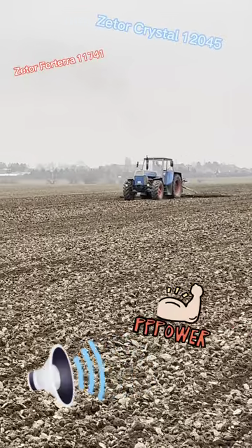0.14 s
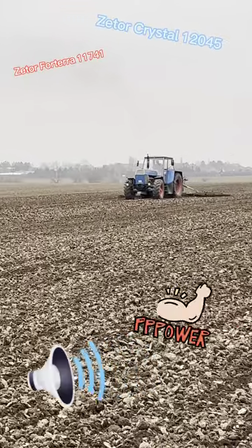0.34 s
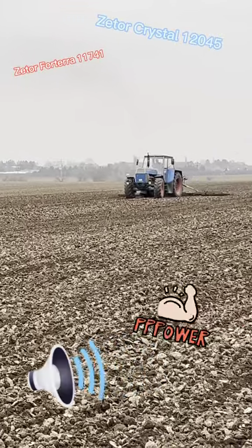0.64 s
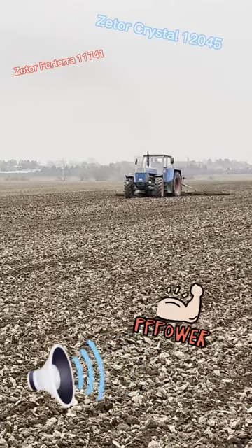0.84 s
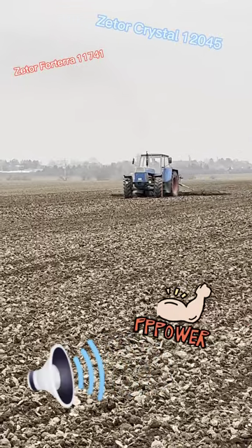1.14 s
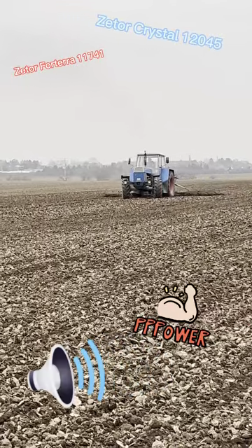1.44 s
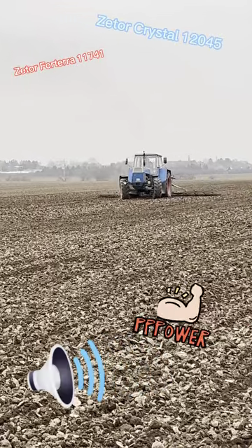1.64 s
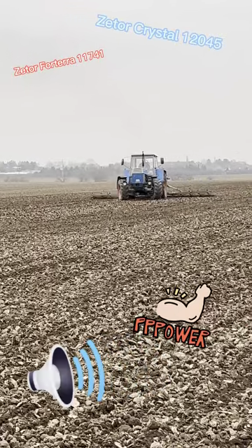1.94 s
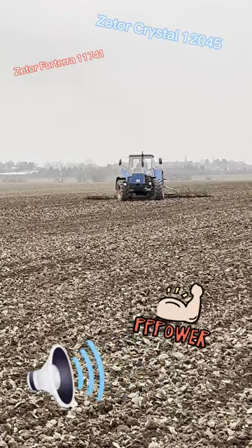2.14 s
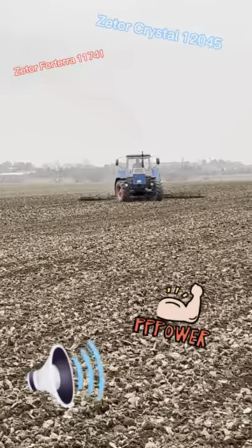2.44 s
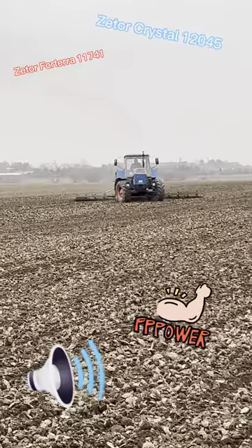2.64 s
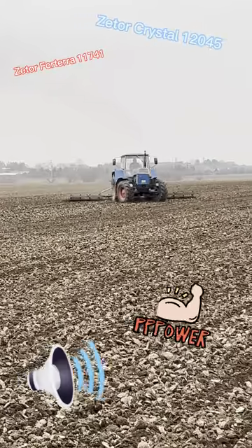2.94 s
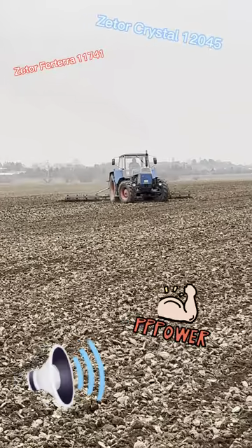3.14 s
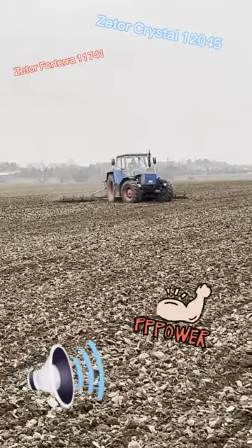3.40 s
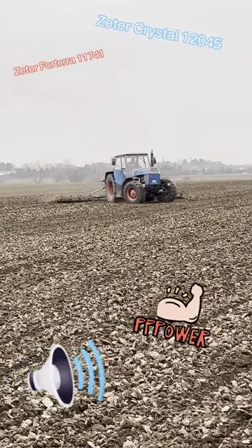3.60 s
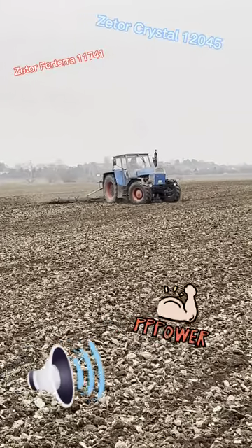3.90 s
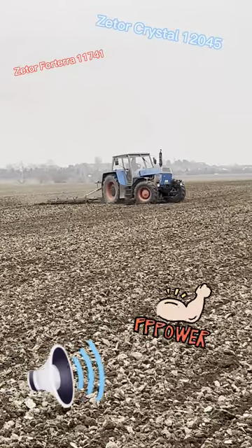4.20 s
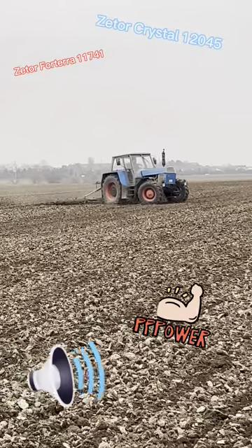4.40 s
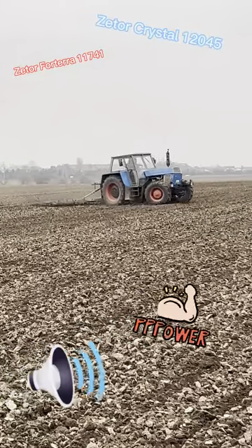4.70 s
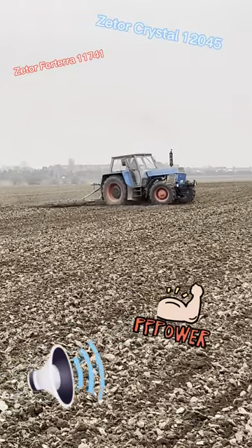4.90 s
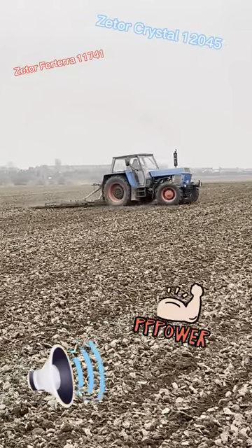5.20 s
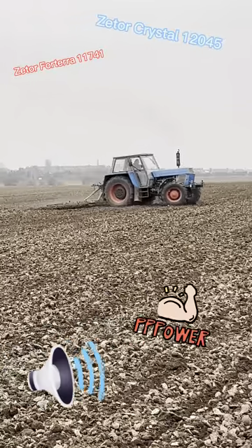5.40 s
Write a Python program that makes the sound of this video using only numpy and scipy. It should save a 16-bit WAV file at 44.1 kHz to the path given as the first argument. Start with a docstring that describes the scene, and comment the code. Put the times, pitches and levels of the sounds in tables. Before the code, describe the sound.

Continuous heavy tractor engine working hard outdoors, already running at the start and still running at the end. The firing pulses merge into a deep buzzing hum with slight speed wavering, overlaid by dense knocking, occasional harder metallic knocks and uneven hiss from fan and harrow. The level rises gently as the machine approaches and shows its side. Low wind lumps brush the handheld stereo microphone in a dry open field.

```python
"""A six-cylinder diesel tractor turns at the end of a bare field and comes nearer, its governor hunting under load.
Exhaust: sines at orders of the engine cycle. Block knock, valve clatter: coloured noise that swells once a firing;
the knock partly repeats each cycle, with gear tones and a few hard rings on it. Fan and harrow: patchy hiss.
Wind: lumpy low noise in a breeze and gusts, plus a part of opposite sign at the two ports of a handheld recorder."""
import sys
import numpy as np
from scipy import signal
from scipy.fft import rfft, irfft, next_fast_len
from scipy.io import wavfile
from scipy.ndimage import uniform_filter1d, map_coordinates

SR = 44100
rng = np.random.default_rng(int(sys.argv[2]) if len(sys.argv) > 2 else 0)


def generate_wav(signal):
    """Clip the signal to [-1, 1] and save it as 16-bit WAV at the path in sys.argv[1]."""
    frames = np.transpose(np.atleast_2d(signal))
    scaled = np.clip(frames, -1, 1) * 32767
    pcm = np.round(scaled).astype(np.int16)
    wavfile.write(sys.argv[1], SR, pcm)


N = 244755
T_S = np.arange(N) / SR

# knock strength of each cylinder, in firing order [level/dB]
CYLINDERS_DB = [-1.2, -1.3, -0.59, -1, -1, 0.31]
FIRING_SCATTER_DB = 0.93  # no two firings knock alike
HISS_PHASE_FIRINGS = .09  # where hiss and flank swell, as a share of a firing; the exhaust's crest is at .25


def amp(db):
    """Gain of a level in dB."""
    return 10 ** (np.asarray(db) / 20)


def unit(x):
    """x at rms 1."""
    return x / np.sqrt(np.mean(x ** 2) + 1e-20)


def along(points, hz):
    """(f/Hz, value) points interpolated on a log axis."""
    f, v = np.transpose(points)
    return np.interp(np.log(hz + 1), np.log(f + 1), v)


def curves(rows):
    """One value per sample for each column after the time."""
    s, *cols = np.transpose(rows)
    return [np.interp(T_S, s, c) for c in cols]


def wobble(rate_hz):
    """Smooth random curve, rate_hz knots a second (at most 40)."""
    knots = rng.standard_normal(int(N * 40 / SR) + 4)
    return map_coordinates(knots, [np.arange(N) * min(rate_hz, 40) / SR])


def bumps(times_s, width_s):
    """One Gaussian bell of height 1 and half width width_s for each time, as rows."""
    return np.exp(-.5 * ((T_S - np.array(times_s)[:, None]) / width_s) ** 2)


def filtered(x, response):
    """x times a complex response of frequency."""
    m = next_fast_len(N + SR // 2)
    return irfft(rfft(x, m) * response(np.fft.rfftfreq(m, 1 / SR)), m)[..., :N]


def coloured(x, spectrum):
    """x through a spectrum, at rms 1."""
    return unit(filtered(x, lambda hz: amp(along(spectrum, hz))))


def band(x, hz, width_hz):
    """The part of x under a Gaussian band; width_hz spans one sigma either side."""
    return filtered(x, lambda f: np.exp(-.5 * ((f - hz) / width_hz * 2) ** 2))


def edge(x, hz, above, db):
    """x with the part above or below hz changed by a gain in dB over time."""
    slope = -6 if above else 6
    part = filtered(x, lambda f: 1 / (1 + (np.maximum(f, 1) / hz) ** slope))
    return x + (amp(db) - 1) * part


def patchy(patchy_db):
    """Two noises sharing patches of random gain, as from air turbulence along the path."""
    z = signal.stft(rng.standard_normal((2, N)), nperseg=512)[2]
    field = rng.standard_normal(z.shape[1:])
    field = uniform_filter1d(field, size=7, axis=0)  # over frequency
    field = uniform_filter1d(field, size=24, axis=1)  # over time
    return signal.istft(z * amp(patchy_db * unit(field)), nperseg=512)[1][:, :N]


def repeating(phase, size, count):
    """Noise that comes back at every turn of phase and slowly changes into new patterns."""
    patterns = rng.standard_normal((count, size))
    drift = np.arange(N) * (count - 1) / N
    old = drift.astype(int)
    share = drift % 1 * np.pi / 2
    at = (phase % 1 * size).astype(int)
    return np.cos(share) * patterns[old, at] + np.sin(share) * patterns[old + 1, at]


def beat(cycle, depth_db, late):
    """Gain that swells once a firing, each cylinder at its own strength and each firing a little different."""
    firing = 6 * cycle - late
    number = np.floor(firing + .5).astype(int)
    cylinder_db = np.take(CYLINDERS_DB, number % len(CYLINDERS_DB))
    strength_db = cylinder_db + FIRING_SCATTER_DB * rng.standard_normal(1000)[number]
    swell = np.cos(2 * np.pi * firing)
    return amp(depth_db * swell + strength_db * (1 + swell) / 2)


def tone(cycle, order, db, waver_db, blur_rad=0., start=None):
    """One order of the engine cycle, its strength wavering and its phase wandering."""
    start = rng.random() if start is None else start
    gain = np.sqrt(2) * amp(db + waver_db * wobble(4.99))  # db is an rms level
    return gain * np.sin(2 * np.pi * (order * cycle + start) + blur_rad * wobble(20))


def side_on():
    """Near 0 while the tractor faces the listener, rising towards 1 as it shows its flank."""
    side_on_s, rise_s = 5.16, 0.19
    return 1 / (1 + np.exp((side_on_s - T_S) / rise_s))


def exhaust(cycle, firing_db):
    """The pipe sounds the firing rate (order 6); uneven cylinders add the orders between."""
    # weaker orders [multiple of the two-turn cycle, level re firing tone/dB, waver/dB]
    weak_orders = [(2, -36, 0), (4, -23, 0), (5, -27, 6), (7, -18, 2), (8, -31.5, -8), (10, -31, 1.5),
                   (11, -32, 2.5), (12, -30.5, 3), (15, -23, 1.7), (16, -33, 3), (18, -33.5, 5.5),
                   (20, -35.5, 4.5), (21, -30.5, 3.5), (24, -36.5, 2.5), (27, -31.5, 3.5), (31, -32.5, 3.5),
                   (33, -25, 0.5), (36, -26, 1)]
    # throb at half the firing rate [t/s, level/dB]
    half_rate = [(0.0, -43), (1.22, -38.5), (1.39, -48), (1.61, -38), (1.88, -47), (1.99, -39.5),
                 (3.62, -43), (5.24, -35), (5.55, -38)]
    # brief dips of drone and throb [t/s, gain/dB]
    dips = [(0.185, -20), (0.24, -6), (0.842, -8), (1.741, -8), (3.153, -16), (3.376, -24), (4.002, -5)]
    dip_half_width_s = .006
    uneven_turns = .25  # phase of both throbs: every other firing comes early rather than louder
    third_db, second_db = -13, -46  # order 9 re firing tone; order 12 when side-on
    weak_follow = 0.78  # share of the firing tone's swell that the weak orders follow
    blur_rad_per_order = .014

    drone = tone(cycle, 6, firing_db, waver_db=.5, start=0)
    throb = tone(cycle, 3, curves(half_rate)[0], waver_db=1.5, start=uneven_turns)
    throb = throb + tone(cycle, 9, firing_db + third_db, waver_db=0.0, start=uneven_turns)
    second = side_on() * tone(cycle, 12, second_db, waver_db=1)

    mean_db = firing_db.mean()
    weak_db = mean_db + weak_follow * (firing_db - mean_db)
    weak = sum(tone(cycle, round(k), weak_db + db, waver_db, blur_rad=blur_rad_per_order * k)
               for k, db, waver_db in weak_orders)
    dip_s, dip_db = np.transpose(dips)
    return amp(dip_db @ bumps(dip_s, dip_half_width_s)) * (drone + throb) + second + weak


def gear_tones(cycle):
    """Timing gear: sines at high orders, sinking into the knock as the tractor turns."""
    # [multiple of the cycle, level at t=0 re knock/dB]
    gear = [(48, -15.5), (60, -13.5), (66, -18), (72, -16.5), (84, -20.5), (96, -19)]
    fade_db_per_s, blur_rad_per_order = -0.48, .013
    return sum(tone(cycle, round(k), db + fade_db_per_s * T_S, waver_db=2.5, blur_rad=blur_rad_per_order * k)
               for k, db in gear)


def block_knock(cycle, alike):
    """Combustion knock through the block's resonances, partly alike each cycle, with the gear on it."""
    # block spectrum [f/Hz, relative density/dB]
    block = [(200, -29), (300, -16.5), (450, -12), (600, -8), (800, -2), (1050, 0.2), (1250, -3),
             (1550, -8), (1750, -9.5), (2000, -10), (2400, -20), (3000, -68)]
    # knock level [t/s, level/dB]
    knocking = [(0.0, -32), (.6, -33), (1.2, -32.5), (1.8, -33), (2.1, -32.5), (2.35, -32.5), (2.6, -31),
                (2.95, -31.5), (3.2, -32.5), (3.6, -32), (3.85, -30), (4.1, -30.5), (4.4, -29.5),
                (4.7, -30), (5.1, -30.5), (5.55, -30)]
    body_hz, hollow_db, fill_s = 626, -8, 0.71  # low body starts thin and fills in
    # a higher block resonance, heard at first and fading as the tractor turns
    nose_hz, nose_width_hz, nose_fade_s = 1320, 190, 2.07
    nose_drop_db, nose_final_db = 3.0, -0.75

    noise = 0.61 * alike + patchy(patchy_db=0.2)
    noise = noise * beat(cycle, depth_db=1.6, late=.31)
    knock = edge(coloured(noise, block), body_hz, False, hollow_db * np.exp(-T_S / fill_s))
    knock[0] += gear_tones(cycle)
    nose_db = nose_drop_db * np.exp(-T_S / nose_fade_s) + nose_final_db
    knock = knock + (amp(nose_db) - 1) * band(knock, nose_hz, nose_width_hz)
    return amp(curves(knocking)[0]) * knock


def hard_firings():
    """A few firings ring the block harder than the rest: decaying sines with a soft onset."""
    # [t/s, level before onset and decay/dB, ring f/Hz]
    hard = [(0.156, -22, 1210), (0.237, -22, 1260), (1.584, -16, 1080), (2.097, -17, 829),
            (2.389, -23, 1180), (2.559, -17, 1140), (2.634, -15, 1070), (2.673, -14.5, 1030),
            (3.181, -20.5, 939), (3.491, -16, 990), (3.615, -20, 1090), (3.66, -16, 1130),
            (3.718, -21, 1080), (4.057, -24, 1020), (4.361, -23.5, 1290), (4.415, -26, 1188),
            (4.888, -16, 1080), (5.053, -22, 1060), (5.22, -18, 1050), (5.503, -14, 1090)]
    t60_s, rise_s = 0.021, 0.001
    out = np.zeros(N + SR)
    t = np.arange(SR // 20) / SR
    for s, db, hz in hard:
        envelope = amp(db - 60 * t / t60_s) * (1 - np.exp(-t / rise_s))
        out[round(s * SR):][:len(t)] += envelope * np.sin(2 * np.pi * hz * t)
    return out[:N]


def valve_clatter(cycle, alike):
    """Valve gear: brighter noise, less alike from cycle to cycle, swelling once a firing."""
    # spectrum [f/Hz, relative density/dB]
    valves = [(1600, -20), (2400, -3), (2850, 1), (3300, -4.5), (3800, -9), (4300, -11), (5100, -7),
              (5600, -11), (6500, -78)]
    # [t/s, level/dB]
    clatter = [(0.0, -45.5), (0.8, -44), (1.8, -43.5), (2.4, -41), (3.2, -42.5), (3.9, -40), (5.55, -40.5)]
    noise = (0.33 * alike + patchy(patchy_db=1.5)) * amp(0.33 * wobble(12))
    noise = noise * beat(cycle, depth_db=1.7, late=.21)
    return amp(curves(clatter)[0]) * coloured(noise, valves)


def fan_and_harrow_hiss(cycle):
    """Patchy noise swelling once a firing; its top grows on approach and both its ends swing less."""
    # spectrum [f/Hz, relative density/dB]
    hiss_spectrum = [(4500, -9.5), (5600, -3), (6200, 5), (6800, 1.5), (7500, -0.5), (8300, -4.5),
                     (9000, -7.5), (10200, -17), (11600, -15.5), (13000, -19), (15000, -24)]
    # [t/s, level/dB]
    hissing = [(0.0, -56.5), (0.5, -51.5), (0.9, -54.5), (1.09, -46.5), (1.3, -50), (1.66, -54), (2.2, -47),
               (2.5, -50.5), (2.78, -49), (2.98, -53.5), (3.33, -51), (3.55, -52), (3.8, -47.5),
               (4.35, -49.5), (5.1, -46), (5.55, -49.5)]
    start_m, speed_m_per_s = 61, 6.9  # distance at the start, closing speed
    treble_hz, treble_swings = 8600, -0.42  # extra dB above the edge per dB of hiss swing
    treble_grows = 0.88  # extra dB above the edge per dB of approach
    low_hz, low_swings = 6800, -0.5  # extra dB below the edge per dB of hiss swing

    near_db = 20 * np.log10(start_m / (start_m - speed_m_per_s * T_S))
    hiss_db, = curves(hissing)
    swing_db = hiss_db - hiss_db.mean()
    treble_db = treble_swings * swing_db + treble_grows * (near_db - near_db.mean())
    air = patchy(patchy_db=1.5) * beat(cycle, depth_db=1.8, late=HISS_PHASE_FIRINGS) * amp(0.52 * wobble(11))
    hiss = edge(coloured(air, hiss_spectrum), treble_hz, True, treble_db)
    hiss = edge(hiss, low_hz, False, low_swings * swing_db)
    return amp(hiss_db) * hiss


def flank_hiss(cycle):
    """A band of patchy hiss that comes forward as the flank turns to the listener."""
    # [t/s, level/dB]
    flank = [(4.6, -56), (4.9, -51), (5.05, -44.5), (5.16, -53), (5.3, -44), (5.38, -50), (5.45, -46),
             (5.55, -51)]
    noise = patchy(patchy_db=2.5) * beat(cycle, depth_db=1.0, late=HISS_PHASE_FIRINGS)
    return amp(curves(flank)[0]) * unit(band(noise, hz=4250, width_hz=570))


def machinery(cycle):
    """Knock, clatter and hiss, each with a direct and a scattered part; hard rings are direct only."""
    alike = repeating(cycle, size=2500, count=14)
    sound = block_knock(cycle, alike) + valve_clatter(cycle, alike)
    sound = sound + fan_and_harrow_hiss(cycle) + flank_hiss(cycle)
    sound[0] += hard_firings()
    return sound


def wind():
    """A breeze and single gusts buffet the housing: low noise in lumps."""
    # spectrum [f/Hz, relative density/dB]
    buffet = [(20, -20), (35, -11), (50, 0), (75, 3), (125, -9.5), (170, -7.5), (230, -24), (400, -41),
              (800, -80)]
    # [t/s, peak level added to the breeze/dB]
    gusts = [(0.0, -42), (0.18, -41), (0.39, -47), (0.85, -39), (1.0, -37), (1.76, -55), (1.94, -41),
             (2.7, -53), (2.89, -39), (3.15, -41), (3.39, -44.5), (3.54, -39), (3.66, -38.5), (4.36, -42)]
    breeze_db, eases_db_per_s, gust_half_width_s = -40, -0.02, 0.025
    gust_s, gust_db = np.transpose(gusts)
    lumps = amp(1.5 * wobble(14)) * rng.standard_normal((2, N))
    gain = amp(breeze_db + eases_db_per_s * T_S) + amp(gust_db) @ bumps(gust_s, gust_half_width_s)
    return gain * coloured(lumps, buffet)


def port_wind():
    """Lumpy buffeting of opposite sign at the two ports."""
    # spectrum [f/Hz, relative density/dB]
    port = [(12, -51), (20, -22), (47, -1.5), (102, 2.5), (162, -4), (258, -13.5), (400, -28), (520, -54),
            (880, -120)]
    start_db, eases_db_per_s = -44, -1.36
    lumps = amp(3.0 * wobble(9)) * rng.standard_normal(N)
    return amp(start_db + eases_db_per_s * T_S) * coloured(lumps, port)


def scene():
    """Direct sound in both channels alike, and a scattered part of opposite sign in the two."""
    # [t/s, firing rate f/Hz, firing tone level/dB]
    engine = [(0.0, 105.1, -30), (0.37, 103.9, -29), (0.74, 104.8, -31), (1.11, 104.2, -28.5),
              (1.85, 104.5, -28.5), (2.4, 106.1, -28.5), (2.62, 105.2, -28), (2.8, 106.1, -27),
              (3.33, 107.5, -28), (3.52, 106, -28.5), (3.88, 106.6, -27.5), (4.44, 106.2, -27),
              (4.81, 105.2, -25.5), (5.36, 105.7, -23.5), (5.55, 105, -24.5)]
    # how alike the two channels are made, by frequency [f/Hz, share 0..1]
    channels_alike = [(400, 1), (1500, 0.99), (2500, 0.84), (3800, 0.76), (5000, 0.75), (5700, .999),
                      (6300, .999), (7000, 0.65), (7700, .999), (8200, .99), (9000, 0.85), (9700, .999),
                      (10900, .999), (11400, 0.56), (11900, .999), (13000, .999), (13600, .8),
                      (14200, .999)]
    firing_hz, firing_db = curves(engine)
    cycle = np.cumsum(firing_hz) / SR / len(CYLINDERS_DB)  # two-turn cycles so far
    direct, scattered = machinery(cycle) + wind()
    direct = direct + exhaust(cycle, firing_db)

    def mid_side_gains(hz):
        turn_rad = np.arccos(np.clip(along(channels_alike, hz), 0, 1)) / 2
        return np.array([np.cos(turn_rad), np.sin(turn_rad)])

    mid, side = filtered(np.array([direct, scattered]), mid_side_gains)
    side = side + port_wind()
    return np.array([mid + side, mid - side])


def record(dry):
    """Phase and level are set apart between the channels; nothing is kept above the band limit."""
    # phase of left channel minus right, rising in steps in the treble [f/Hz, phase/rad]
    phase_apart = [(100, 0.06), (400, 0.08), (650, 0), (1000, 0.28), (1350, -0.48), (1800, 1.24),
                   (2100, 1.0), (2600, 2.5), (3800, 0.61), (5000, 1.4), (5700, 3.0), (6250, 3.3), (6500, 4),
                   (7650, 6.1), (8200, 6.4), (9200, 7.5), (9700, 9.2), (10900, 9.6), (11800, 12.3),
                   (13100, 12.8), (14200, 15.7), (15200, 15.7)]
    # the housing lifts the left port and shades the right [f/Hz, left minus right level/dB]
    shade = [(100, 0.1), (380, -1), (550, 4.5), (750, 0.5), (1050, 9), (1300, 10.5), (1600, 1.5),
             (2100, -0.5), (2600, -0.5)]
    top_hz = 15300
    half = np.array([[.5], [-.5]])  # left, right

    def channels(hz):
        gain = amp(half * along(shade, hz))
        phase = np.exp(1j * half * along(phase_apart, hz))
        return gain * phase * (hz < top_hz)

    return filtered(dry, channels)


dry = scene()
out = record(dry)
generate_wav(out)
```